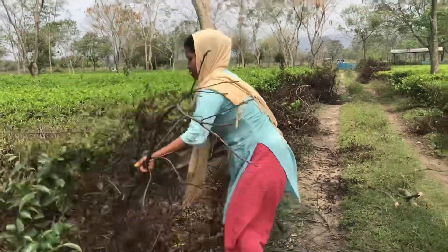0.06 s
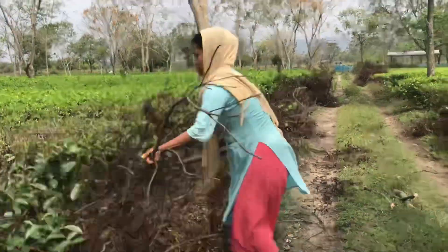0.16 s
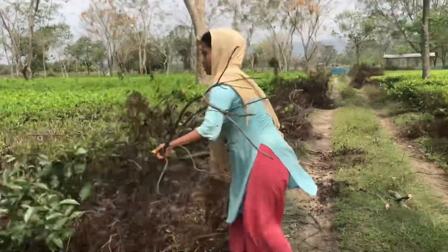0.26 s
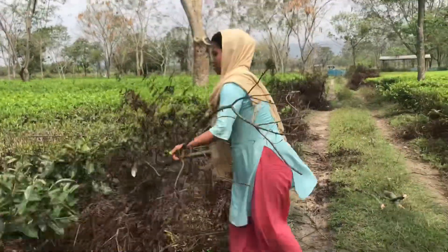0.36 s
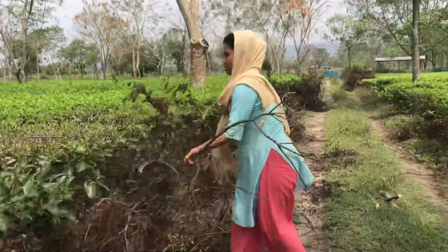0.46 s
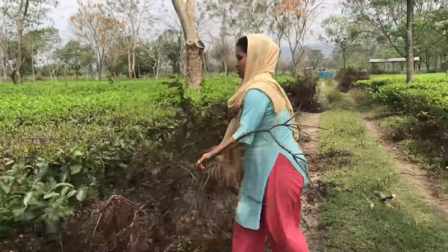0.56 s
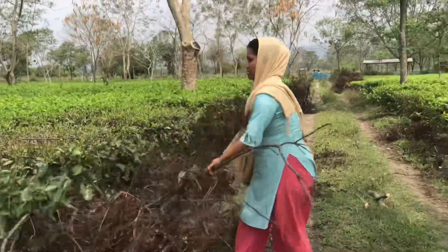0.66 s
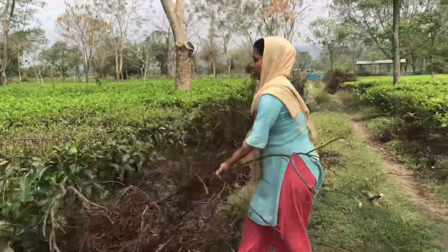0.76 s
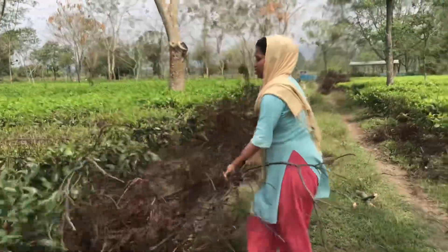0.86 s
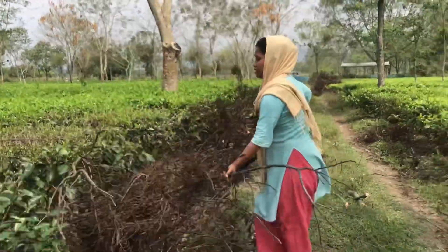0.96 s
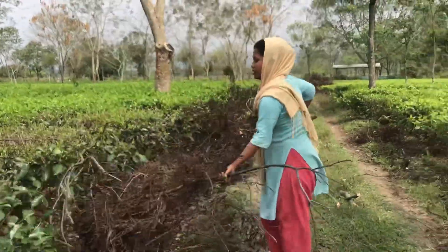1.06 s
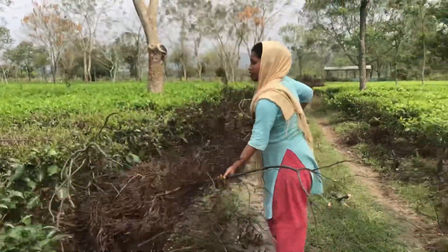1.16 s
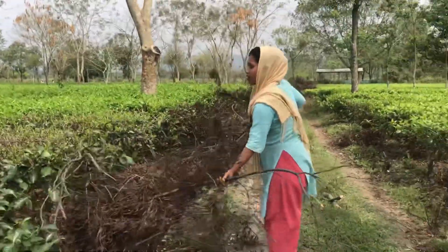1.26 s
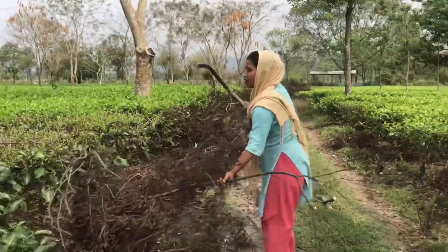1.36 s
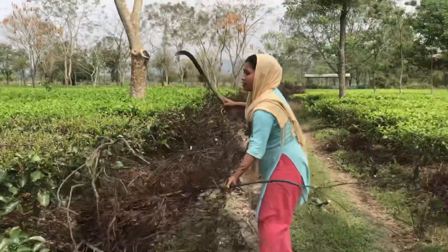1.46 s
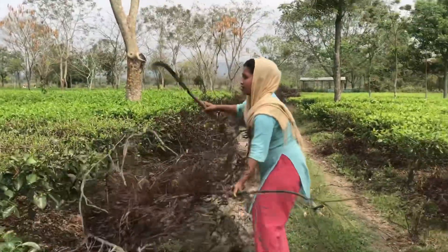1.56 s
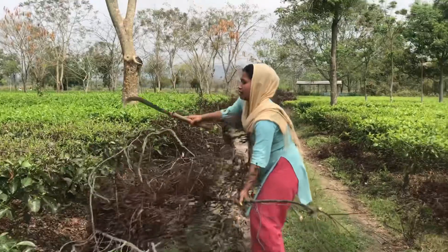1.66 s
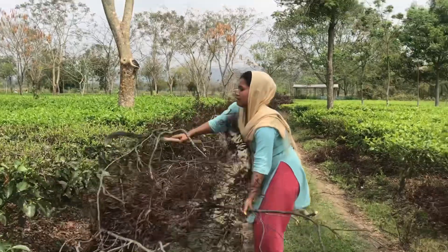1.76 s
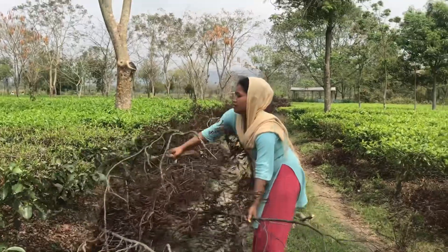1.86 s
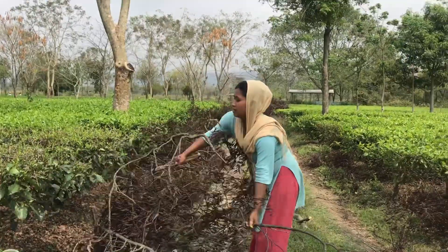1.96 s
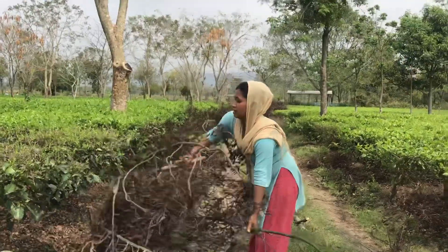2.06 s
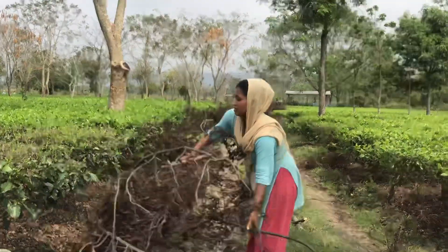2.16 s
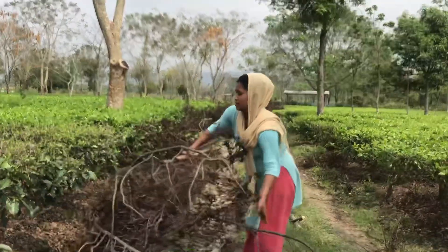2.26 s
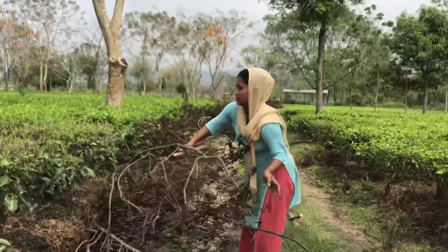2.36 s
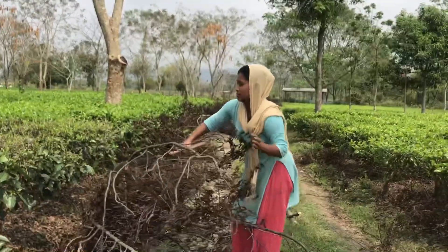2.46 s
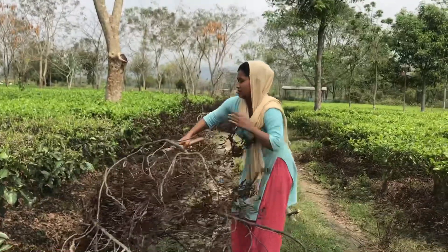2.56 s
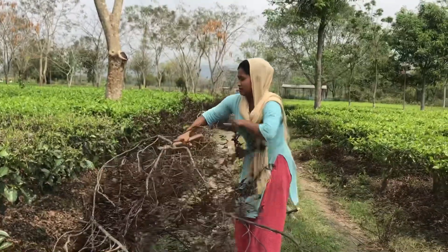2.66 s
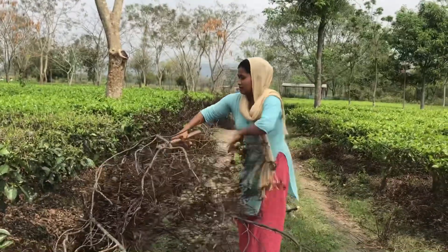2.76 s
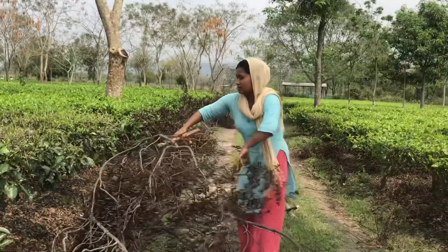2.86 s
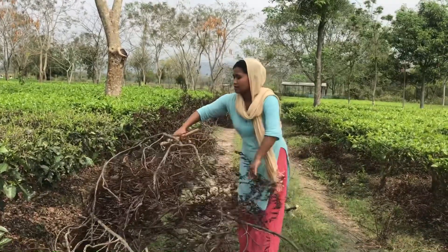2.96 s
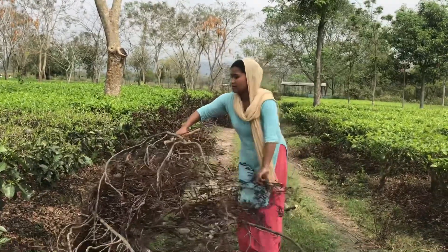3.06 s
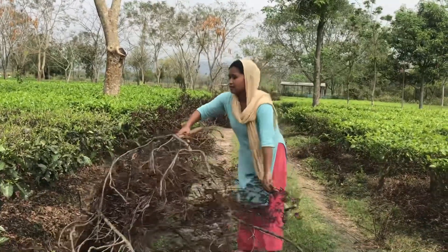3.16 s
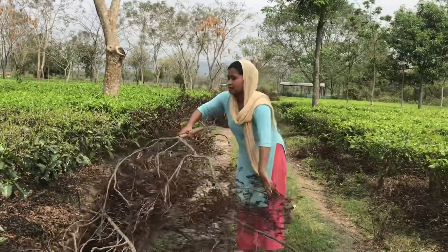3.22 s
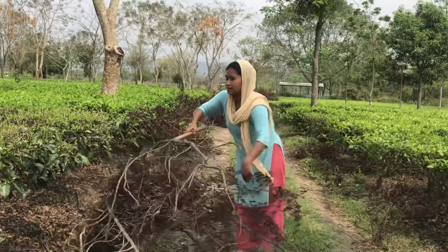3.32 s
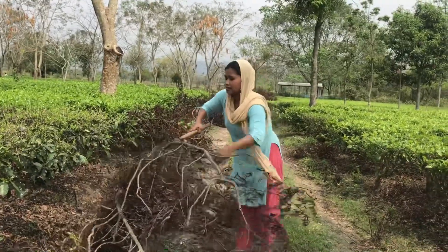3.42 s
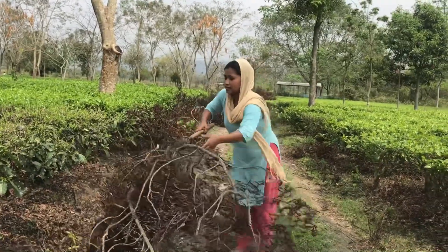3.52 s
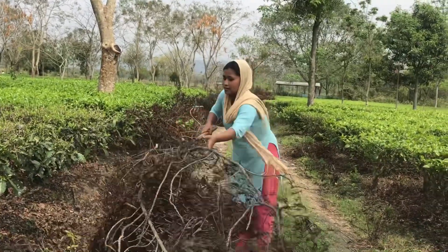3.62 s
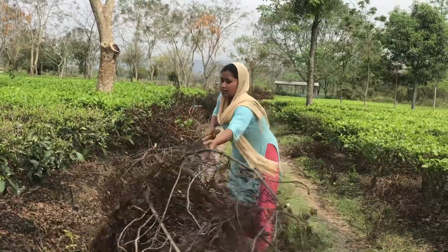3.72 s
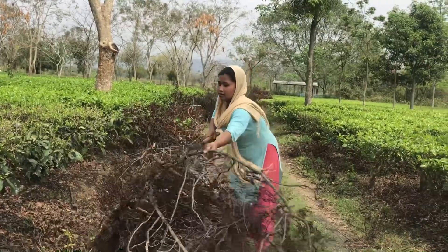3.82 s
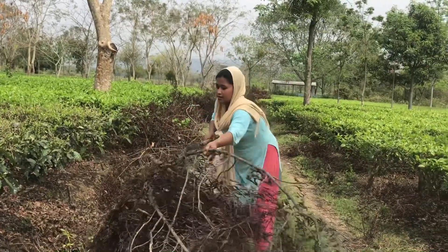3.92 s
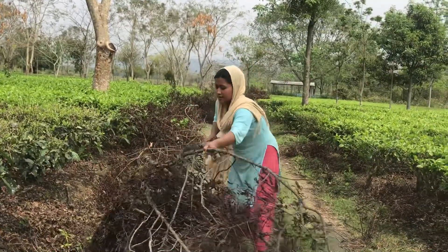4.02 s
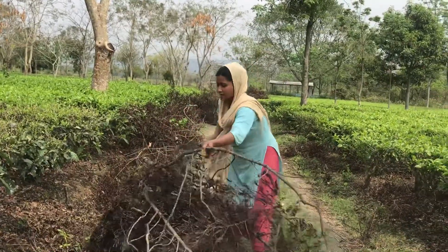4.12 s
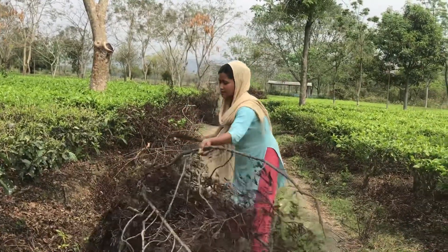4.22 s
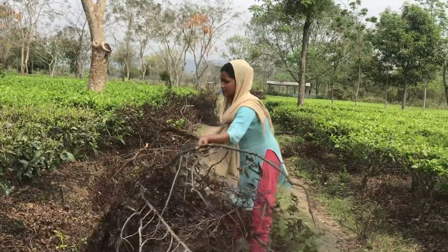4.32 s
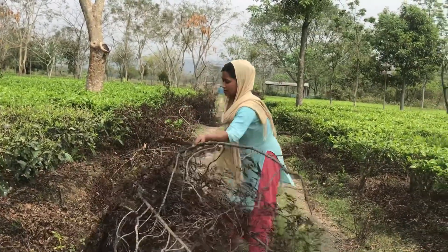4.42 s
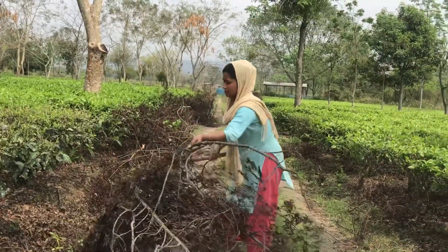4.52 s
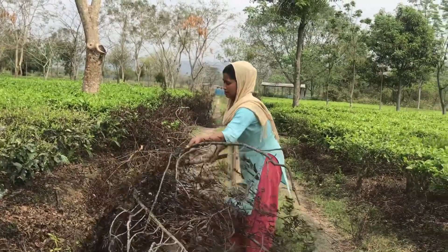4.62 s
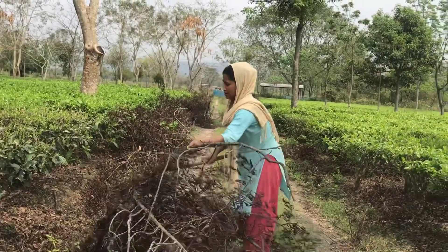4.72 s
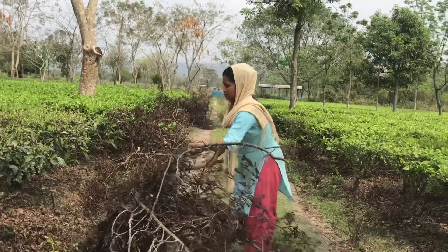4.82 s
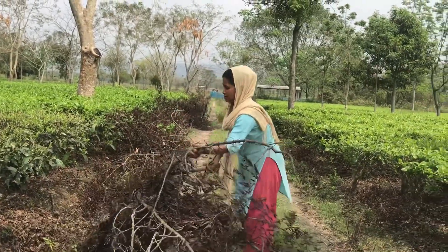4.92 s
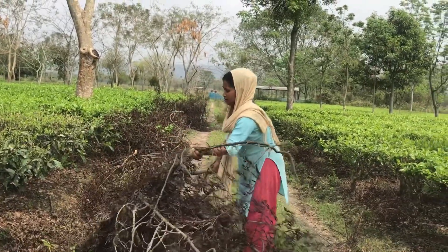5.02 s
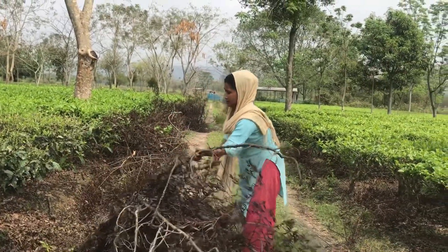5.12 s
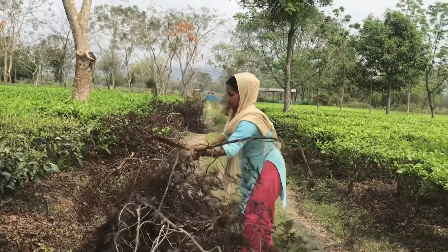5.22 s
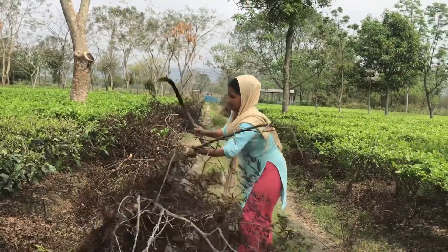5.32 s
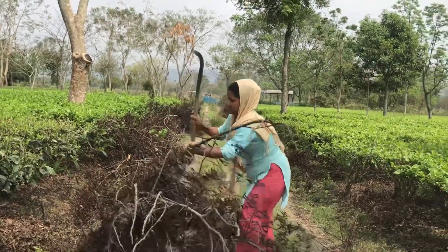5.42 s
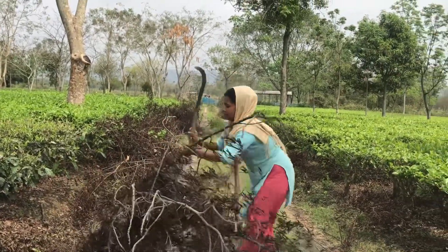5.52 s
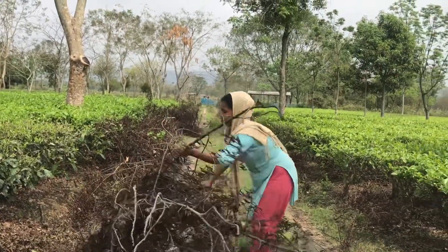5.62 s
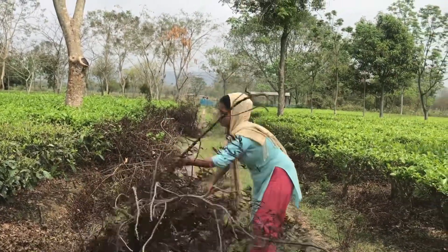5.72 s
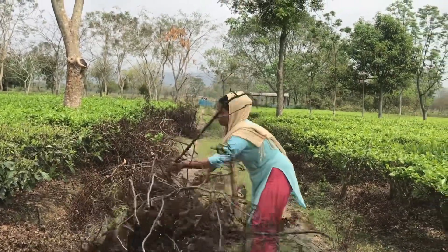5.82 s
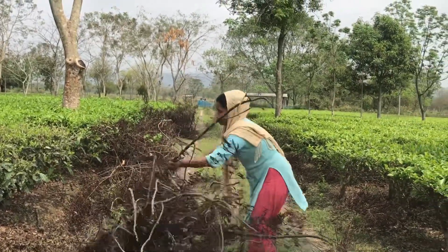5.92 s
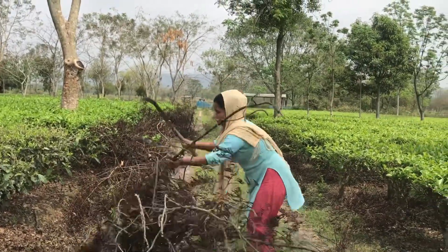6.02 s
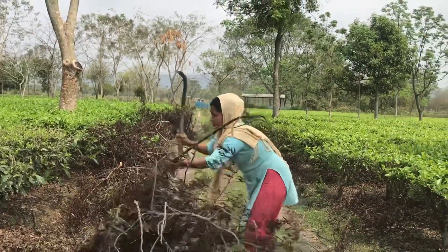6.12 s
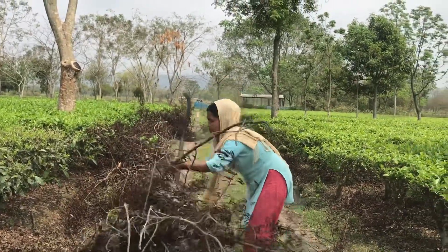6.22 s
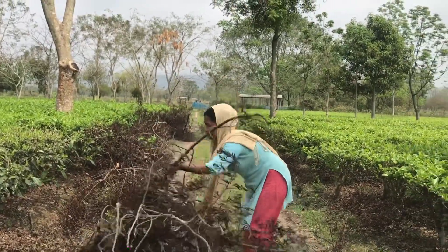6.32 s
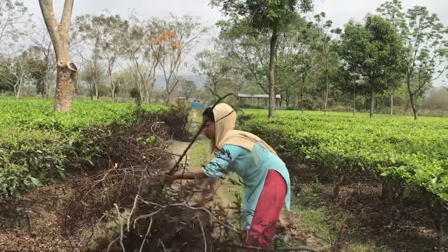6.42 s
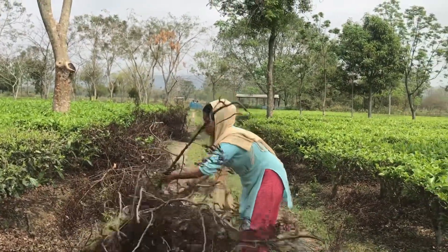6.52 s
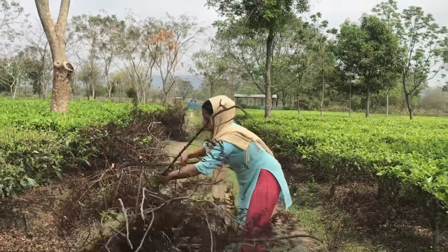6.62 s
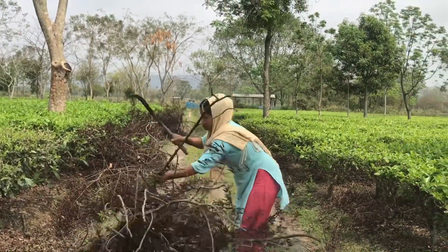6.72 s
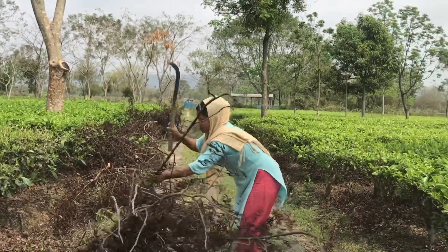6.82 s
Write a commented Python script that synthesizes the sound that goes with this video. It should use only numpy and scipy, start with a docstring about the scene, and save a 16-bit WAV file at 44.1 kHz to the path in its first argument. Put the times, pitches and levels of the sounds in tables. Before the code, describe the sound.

Close crackling of dry branches pulled by hand in the open, faint far bird, then sharp blade blows and a loud snap.

```python
"""Brushwood dragged and bundled

Dry brushwood is dragged and bundled by hand on a path between hedges: dense grains rustle and scrape.
Damped modes make the knocks, with two hard billhook blows; noise bursts make the snaps and ticks.
A faint scattered tail follows the blows, snaps and ticks.
Behind lie a low rumble with a drone, soft shaped-noise air and the gliding tones of a far bird."""
import sys
import numpy as np
from scipy import signal
from scipy.fft import rfft, irfft, next_fast_len
from scipy.io import wavfile
from scipy.ndimage import uniform_filter1d, map_coordinates

SR = 44100
rng = np.random.default_rng(int(sys.argv[2]) if len(sys.argv) > 2 else 0)


def output_pcm(signal):
    """Save a mono or channel-first signal as 16-bit PCM at the path in sys.argv[1].

    Samples are clipped to [-1, 1] before scaling.
    """
    pcm = np.clip(np.atleast_2d(signal).T, -1, 1) * 32767
    wavfile.write(sys.argv[1], SR, np.round(pcm).astype(np.int16))


N = 303275  # length in samples

# Levels in the tables are relative; each source adds its own gain.
# pulls on the pile: peak t/s, swell time constant/s, twig rustle level/dB, ground scrape level/dB
PULLS = [(0.02, 0.16, -41.5, -46.5), (0.659, .2, -39, -45), (1.04, 0.15, -55.5, -53.5),
         (1.4, 0.16, -58.5, -64.5), (1.74, 0.26, -59.5, -61), (2.45, 0.34, -62, -66),
         (2.95, 0.34, -56, -73), (3.5, 0.26, -53.5, -62), (3.92, 0.18, -54, -74), (4.31, 0.056, -62.5, -75),
         (4.78, 0.23, -58.5, -75), (5.38, 0.34, -56, -62.5)]
# rustling twigs, spectrum: f/Hz, level/dB per Hz
TWIG_SPECTRUM = [(700, -31), (2000, -13.5), (3800, -5), (5000, -6.5), (6500, -2), (7900, -6), (9500, -1),
                 (10500, -6), (11800, 0), (13500, -4.5), (16000, -7)]
# scraping over the ground, spectrum: f/Hz, level/dB per Hz
SCRAPE_SPECTRUM = [(120, 2.5), (300, -2.5), (700, -0.5), (1400, 0.5), (2500, -2.5), (4000, -2.5),
                   (7000, -2.5), (16000, -50)]
# short swells of noise: boughs sliding past, and after the hard blow at 5.70 s a low tail
# and a small rustle: peak t/s, half-length/s, level/dB, centre f/Hz
SWELLS = [(0.077, 0.077, -42, 4750), (0.656, 0.074, -43, 3200), (1.465, 0.12, -56.5, 3050),
          (1.504, 0.066, -48.5, 7680), (1.724, 0.041, -58, 1900), (2.051, 0.086, -60, 4500),
          (2.43, 0.035, -50.5, 11000), (3.164, .13, -53.5, 2930), (3.421, 0.038, -55, 5040),
          (3.477, 0.1, -55, 9900), (4.014, 0.11, -61, 11100), (4.602, 0.11, -55.5, 1850),
          (5.357, 0.12, -52, 8000), (5.539, 0.093, -56.5, 2940), (5.759, 0.022, -48, 560),
          (5.829, 0.024, -50.5, 2820)]
# blows on thick wood: t/s, level/dB, rise/s, centre f/Hz, twig shiver level/dB, extra damping/(dB/s)
BLOWS = [(0.3271, -31, 0.00087, 1400, -11.5, 1500), (0.335, -31, 0.00059, 1710, -17, 1000),
         (1.186, -39.5, 0.0013, 1890, -15, 100), (2.003, -33, 0.00062, 940, -13, 300),
         (3.509, -38.5, 0.00054, 1930, -28, 500), (4.353, -44, 0.0011, 1700, -32, 500),
         (4.559, -36, 0.0007, 1900, -22, 2004), (4.57, -22.5, 0.0025, 580, -23.5, 604),
         (5.585, -41.5, 0.0012, 450, -33, 800), (5.7007, -4.5, 0.0015, 1880, -28, 147),
         (6.3826, -7, 0.0013, 1710, -22, 700)]
# modes of a struck branch: f/Hz, level/dB, t60/s before the extra damping
BRANCH_MODES = [(217, -14, 0.45), (315, -6, 0.068), (453, -13.5, 0.037), (575, -2.5, 0.056),
                (757, -1.5, 0.045), (940, -5, 0.029), (1275, -4, 0.0232), (1440, 6, 0.018),
                (2276, -9.5, 0.099), (2573, -1, 0.039), (2663, -1, 0.052), (3190, -0.5, 0.028),
                (3550, -7, 0.039), (4090, -2.5, 0.052), (4325, 1, 0.039), (4850, -17, 0.038),
                (5280, 0.5, 0.024), (5840, -14, 0.025), (6170, 3.5, 0.022)]
# crushed wood fibres, spectrum: f/Hz, level/dB per Hz
CRUSH_SPECTRUM = [(100, -5), (420, -22), (800, -3.5), (1300, -3), (1800, -6.5), (3000, -6), (6000, -10),
                  (10000, -12), (16000, -16)]
# decay of the crushed fibres: f/Hz, t60/s before the extra damping
CRUSH_T60 = [(200, 0.11), (1000, 0.047), (4000, 0.072), (12000, 0.024)]
# twigs shaken by a blow, spectrum: f/Hz, level/dB per Hz
SHIVER_SPECTRUM = [(150, 6), (500, -5.5), (1500, -2.5), (3000, -2), (6500, 4), (8000, 3.5), (12000, 5),
                   (16000, 0.5)]
# twigs breaking: t/s, level/dB, spectral tilt/(dB/octave)
SNAPS = [(0.3272, -22, -5), (.549, -23, 1.5), (0.837, -30, -2), (1.1795, -24.5, 16.5), (2.419, -33, 7),
         (3.6253, -16.5, 1.5), (3.6265, -13.5, 4.5), (4.1956, -33, 19), (4.9882, -28.5, 5),
         (4.9901, -24, 1.5), (5.638, -32.5, 2), (5.6978, -22, -2), (6.4474, -4.5, 1), (6.49, -10, 7),
         (6.817, -33.5, 5)]
# fracture, spectrum before the tilt: f/Hz, level/dB per Hz
FRACTURE_SPECTRUM = [(200, -31), (900, -8.5), (1800, -9.5), (3100, -2), (5500, -2), (7000, -5),
                     (10000, -2.5), (13000, -3.5), (16000, -13.5)]
# thin twigs flicking past each other: t/s, level/dB, f/Hz
TICKS = [(0.9048, -25, 9550), (1.0, -32.5, 11300), (1.0737, -31, 11300), (1.13, -23, 6860),
         (1.1502, -32, 8250), (1.241, -32.5, 8900), (1.8332, -38, 9700), (1.9619, -36.5, 3640),
         (2.074, -31.5, 7800), (2.315, -37.5, 6600), (3.596, -34, 4370), (3.981, -34.5, 11500),
         (4.0088, -33.5, 4500), (5.0272, -34, 9000), (5.3787, -35.5, 9050), (6.859, -36.5, 6100)]
# scatter from the bushes: f/Hz, t60/s
HEDGE_T60 = [(200, 0.77), (2000, 0.29), (6000, 1), (14000, 0.11)]
# far bird: t/s, length/s, starting f/Hz, level/dB
WHISTLES = [(2.0, 0.13, 2950, -66), (2.229, 0.22, 2850, -68), (2.5, 0.24, 2930, -72),
            (2.822, 0.29, 2640, -74)]
# low rumble, spectrum: f/Hz, level/dB per Hz
RUMBLE_SPECTRUM = [(18, -41), (30, -19), (42, -4.5), (60, -1.5), (78, -3), (100, -7), (140, -15),
                   (200, -22.5), (400, -56), (1000, -86)]
# open air, spectrum: f/Hz, level/dB per Hz
AIR_SPECTRUM = [(60, -16), (150, 1.5), (260, -1.5), (380, -10), (550, -13.5), (1300, -14.5), (2000, -17),
                (4000, -26), (16000, -21.5)]

RUSTLE_FADE, SCRAPE_FADE = 1.05, 1.36  # time to die away, over the time to swell
REST_DB = -64.5  # the bundle stirring in the hands between pulls, relative as in PULLS
SETTLE_DB, SETTLE_DB_PER_S = -44, 23  # twigs settling: level relative to the blow's, and fading rate
FOCUS_DB, FOCUS_PER_DB = 0.45, .045  # loss one octave off centre at 0 dB; its growth for lighter knocks
TICK_T60_S = 0.056
WHISTLE_FALL_HZ_PER_S = 750  # mean fall in pitch
RUMBLE_DB, RUMBLE_SWING_DB, RUMBLE_EASE_DB_PER_S = -51.5, 2.3, 0.46  # starting level, swing, slow calming
TOP_HZ = 16000  # upper band limit


def brushwood():
    """Stochastic friction: dense contacts between twigs rustle while the pile scrapes in small jerks."""
    twig_db, scrape_db = motion()
    jerks = wobble(rate=70)
    contacts = grains(rate=1900, spread_db=4.2, ring_s=.0007) + 1.25 * rng.standard_normal(N)
    grit = grains(rate=1900, spread_db=3.6, ring_s=.0007) + 1.2 * rng.standard_normal(N)
    rustle_colour = coloured(patchy(contacts, depth_db=0.8), TWIG_SPECTRUM)
    scrape_colour = coloured(patchy(grit, depth_db=2.5), SCRAPE_SPECTRUM)
    rustle = amp(twig_db + 2.0 + 1.05 * jerks) * rustle_colour
    scrape = amp(scrape_db + 1.7 + 1.14 * jerks) * scrape_colour
    return rustle + scrape + crackle(twig_db)


def motion():
    """Addition of powers: pulls swell and die away, twigs settle after blows; rustle and scrape in dB."""
    t = np.arange(N) / SR
    rustle, scrape = np.full(N, amp(REST_DB) ** 2), np.zeros(N)
    for s, swell_s, twig_db, scrape_db in PULLS:
        before = np.maximum(s - t, 0) / swell_s
        after = np.maximum(t - s, 0) / swell_s
        rustle += (amp(twig_db) * np.exp(-before - after / RUSTLE_FADE)) ** 2
        scrape += (amp(scrape_db) * np.exp(-before - after / SCRAPE_FADE)) ** 2
    for s, db, *_ in BLOWS:
        settling_db = db + SETTLE_DB - SETTLE_DB_PER_S * t[:2 * SR]
        add(rustle, s, amp(settling_db) ** 2)
    return 10 * np.log10([rustle, scrape])


def grains(rate, spread_db, ring_s):
    """Superposition of tiny impacts: each is a damped ring of its own pitch, size and life; rms 1."""
    when, pitch, size, life = rng.random((int(rate * N / SR), 4)).T[:, :, None]
    k = np.arange(SR // 200)
    tau = ring_s * (.5 + life) * SR  # decay constant in samples
    strength = amp(-spread_db * np.log(1 - .99 * size))  # few large, many small
    decay = strength / np.sqrt(tau) * np.exp(-k / tau)
    rings = decay * np.sin(2 * np.pi * pitch * TOP_HZ * k / SR)
    places = (when * N).astype(int) + k
    return unit(np.bincount(places.ravel(), rings.ravel(), N)[:N])


def patchy(x, depth_db):
    """Changing contact: the twigs in touch vary, so the colour shifts in short, narrow patches."""
    z = signal.stft(x, nperseg=512)[2]
    field = uniform_filter1d(rng.standard_normal(z.shape), size=7, axis=0)  # across frequency
    field = uniform_filter1d(field, size=5, axis=1)  # across time
    return signal.istft(z * amp(depth_db * unit(field)), nperseg=512)[1][:N]


def crackle(level_db):
    """Catch and release: stray twigs ring, each in its own band, louder when the pile moves more."""
    track, t = np.zeros(N), np.arange(SR // 40) / SR
    for when, pitch, size, life in rng.random((int(40 * N / SR), 4)):  # 40 a second
        hz = 2500 * 5.5 ** pitch
        ring = coloured(rng.standard_normal(len(t)), hump(hz, skirt_db=12.5))
        db = level_db[int(when * N)] - 7.0 + 13 * size ** 2
        t60 = 0.006 + 0.049 * life
        add(track, when * N / SR, amp(db) * ring * amp(-60 * t / t60))
    return track


def swells():
    """Band-limited impulsive noise: boughs sliding past, and a low tail and small rustle after a blow."""
    track = np.zeros(N)
    for s, half_s, db, hz in SWELLS:
        swell = np.hanning(int(2 * half_s * SR))
        impulses = spiky(len(swell), spread_db=4)
        progress, knots = np.linspace(0, 1, len(swell)), np.linspace(0, 1, num=24)
        unevenness = np.interp(progress, knots, rng.standard_normal(size=24))
        band = [(hz / 6, -22), (hz / 2, -6), (hz, 0), (hz * 2, -7), (hz * 5, -24)]
        add(track, s - half_s, amp(db + 2.7 * unevenness) * swell * coloured(impulses, band))
    return track


def blows():
    """Modal impact: a blow crushes fibres, rings the branch and shakes its twigs; grip adds damping."""
    track, t = np.zeros(N), np.arange(SR // 2) / SR
    mode_hz, mode_db, t60 = np.transpose(BRANCH_MODES)[:, :, None]
    # neighbouring bending modes push the air in opposite directions
    sign = (-1) ** np.arange(len(BRANCH_MODES))[:, None]
    for s, db, rise, centre_hz, shiver_db, damping in BLOWS:
        def focus_db(hz):
            """Size and pitch: thick branches answer low, thin ones high; light knocks are narrower."""
            return -FOCUS_DB * np.exp(-FOCUS_PER_DB * db) * np.log2(hz / centre_hz) ** 2
        sizes = amp(mode_db + focus_db(mode_hz) + .5 * rng.standard_normal(mode_hz.shape))
        modes = sign * sizes * amp(-60 * t / t60) * np.sin(2 * np.pi * mode_hz * t)
        ring = modes.sum(0) / np.linalg.norm(sizes)
        crush = [(hz, level + focus_db(hz)) for hz, level in CRUSH_SPECTRUM]
        fibres = fading(coloured(rng.standard_normal(len(t)), crush), CRUSH_T60)
        bite = np.minimum(t / rise, 1) ** 2 * amp(-abs(damping) * t)
        knock = bite * (amp(-3.0) * ring + amp(-9.5) * fibres)
        twigs = coloured(spiky(len(t), spread_db=3), SHIVER_SPECTRUM)
        shiver = twigs * (1 - np.exp(-t / 0.00067)) * amp(-60 * t / 0.41)
        add(track, s, amp(db) * (knock + amp(shiver_db) * shiver))
    return track


def snaps():
    """Brittle fracture: stress is released in one sharp pulse, then splinters and twigs chatter."""
    track, lead = np.zeros(N), SR // 500  # samples of silence ahead of the pulse
    t = np.arange(SR // 4) / SR
    parting = amp(-60 * t / 0.0049)
    splinters = amp(-1.5) * amp(-60 * t / 0.02)
    chatter = amp(-21.5) * amp(-60 * t / 0.56)
    shape = parting + splinters + chatter
    for s, db, slope in SNAPS:
        force = np.pad(rng.standard_normal(len(t)) * shape / np.linalg.norm(shape), (lead, 0))
        force[lead] += .7  # the pulse itself
        crack = coloured(force, FRACTURE_SPECTRUM, slope)
        add(track, s - lead / SR, amp(db + 9.5) * crack / np.linalg.norm(crack))
    return track


def ticks():
    """Resonance of a thin rod: a twig clicks over another and rings in a narrow band."""
    track, t = np.zeros(N), np.arange(SR // 8) / SR
    for s, db, hz in TICKS:
        ring = coloured(rng.standard_normal(len(t)), hump(hz, skirt_db=20))
        click = np.exp(-t / .0008)
        add(track, s, amp(db - 12.5) * ring * (0.6 * click + amp(-60 * t / TICK_T60_S)))
    return track


def hedges(x):
    """Diffuse scattering: the bushes return a faint tail, 10 ms late, that decays by frequency."""
    tail = np.pad(fading(rng.standard_normal(SR // 2), HEDGE_T60), (SR // 100, 0))
    return signal.fftconvolve(x, tail / np.linalg.norm(tail))[:N]


def bird():
    """Frequency glide: thin far whistles fall in pitch, quickly at first, then level out."""
    track = np.zeros(N)
    for s, length, start_hz, db in WHISTLES:
        u = np.linspace(0, 1, int(length * SR))
        hz = start_hz - WHISTLE_FALL_HZ_PER_S * length * (1 - (1 - u) ** 1.43)
        flutter_db = 2.5 * wobble(rate=35)[:len(u)]
        tone = np.sin(2 * np.pi * np.cumsum(hz) / SR)
        add(track, s, amp(db + flutter_db) * np.sin(np.pi * u) * tone)
    return track


def background():
    """Shaped noise: a low rumble swells and sinks with a wavering drone, under nearly steady air."""
    swings = wobble(rate=7)
    rumble_db = RUMBLE_DB - RUMBLE_EASE_DB_PER_S * np.arange(N) / SR
    rumble_noise = coloured(rng.standard_normal(N), RUMBLE_SPECTRUM)
    rumble = amp(rumble_db + RUMBLE_SWING_DB * swings) * rumble_noise
    drone_hz = 75 + 3.5 * wobble(rate=9)
    waver_db = 2.5 * wobble(rate=8)
    drone = amp(-57 + waver_db) * np.sin(2 * np.pi * np.cumsum(drone_hz) / SR)
    drift_db = .6 * wobble(rate=2.5)
    air = amp(-61.5 + drift_db) * coloured(rng.standard_normal(N), AIR_SPECTRUM)
    return rumble + drone + air


def amp(db):
    """Level law: decibels to an amplitude gain."""
    return 10 ** (np.asarray(db) / 20)


def unit(x):
    """Normalisation: scale to rms 1."""
    return x / np.sqrt(np.mean(x ** 2) + 1e-20)


def along(points, hz):
    """Logarithmic pitch scale: interpolate (f/Hz, value) points on a log axis."""
    f, v = np.transpose(points)
    return np.interp(np.log(hz + 1), np.log(f), v)


def wobble(rate):
    """Slow random modulation: a smooth curve through rate random knots a second."""
    knots = rng.standard_normal(int(N * rate / SR) + 4)
    return map_coordinates(knots, [np.arange(N) * rate / SR])


def coloured(x, spectrum, slope=0):
    """Linear filtering: x shaped by a spectrum and tilted by slope in dB/octave, at rms 1."""
    size = next_fast_len(len(x))
    hz = np.fft.rfftfreq(size, 1 / SR)
    gain = amp(along(spectrum, hz) + slope * np.log2(1 + hz / 500))
    return unit(irfft(rfft(x, size) * gain, size)[:len(x)])


def fading(x, t60s):
    """Frequency-dependent damping: each frequency of x dies at its own speed."""
    hz, t, z = signal.stft(x, SR, nperseg=128)
    decay = amp(-60 * t / along(t60s, hz)[:, None])
    return signal.istft(z * decay, SR, nperseg=128)[1][:len(x)]


def spiky(count, spread_db):
    """Impulsive noise: a spray of tiny impulses whose sizes scatter by spread_db."""
    return rng.standard_normal(count) * amp(spread_db * rng.standard_normal(count))


def hump(hz, skirt_db):
    """Resonance curve: spectrum points that peak at hz and lie skirt_db lower one octave away."""
    octaves = np.linspace(-3, 3, num=25)
    return np.transpose([hz * 2 ** octaves, -skirt_db * np.sqrt(np.abs(octaves))])


def add(track, s, sound):
    """Superposition: mix a sound in at time s."""
    part = track[round(s * SR):][:len(sound)]
    part += sound[:len(part)]


def scene():
    """Superposition of sources: all the wood close by, the field behind it."""
    hits = blows() + snaps() + ticks()
    wood = brushwood() + swells() + hits + amp(-25.0) * hedges(hits)
    return (wood + bird() + background())[None]


def record(dry):
    """Band limitation: a steep low-pass removes what lies above TOP_HZ."""
    size = next_fast_len(N + SR // 2)
    hz = np.fft.rfftfreq(size, 1 / SR)
    return irfft(rfft(dry, size) / (1 + (hz / TOP_HZ) ** 160), size)[:, :N]


dry = scene()
out = record(dry)
output_pcm(out)
```